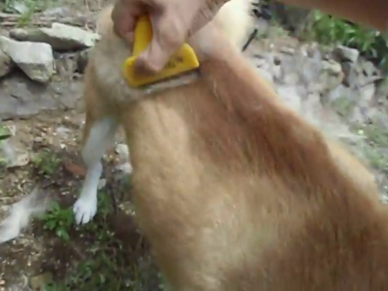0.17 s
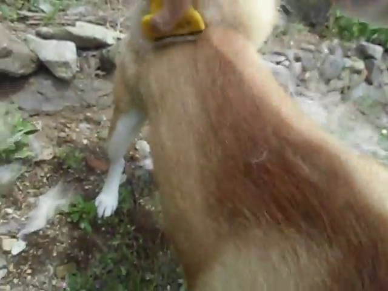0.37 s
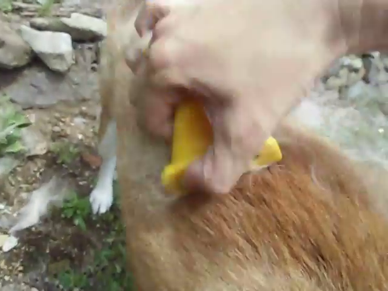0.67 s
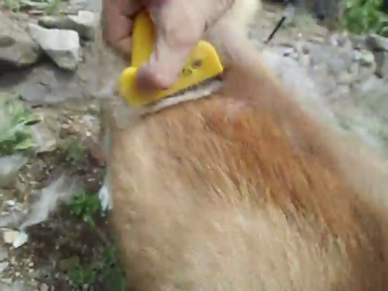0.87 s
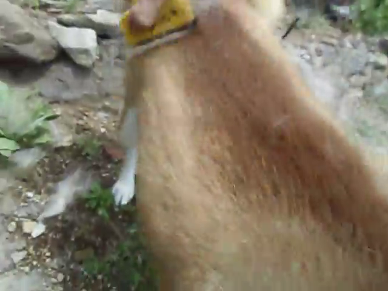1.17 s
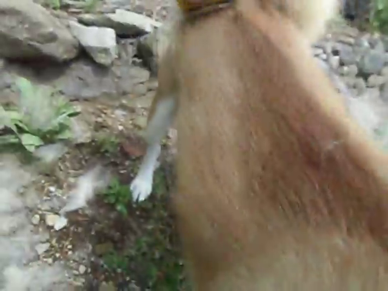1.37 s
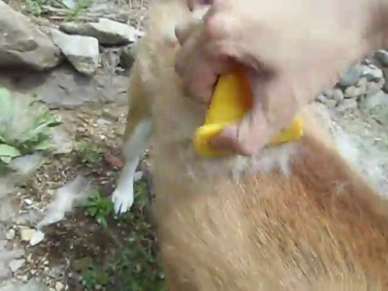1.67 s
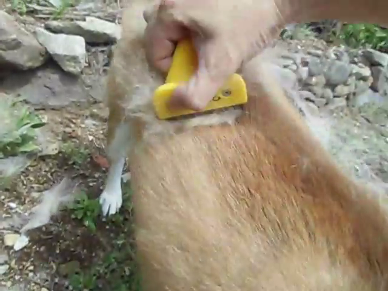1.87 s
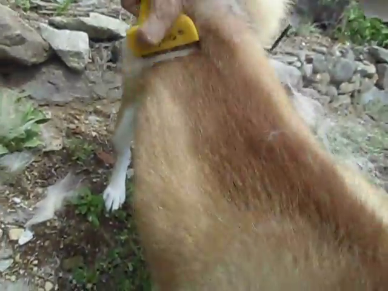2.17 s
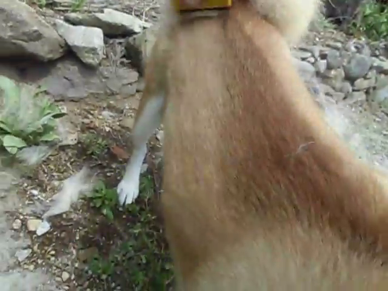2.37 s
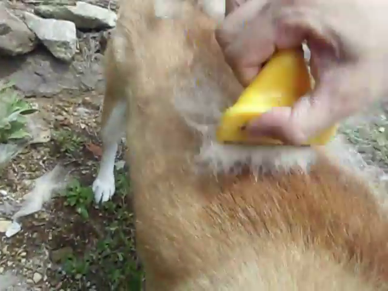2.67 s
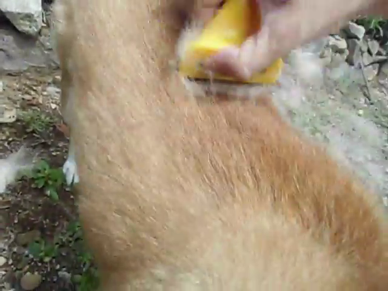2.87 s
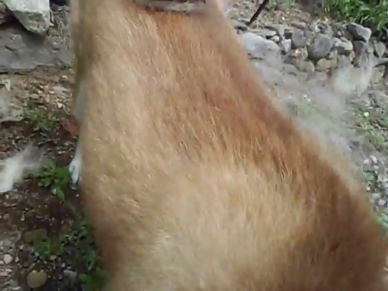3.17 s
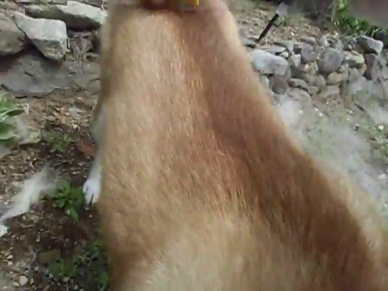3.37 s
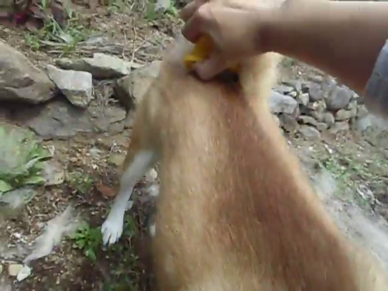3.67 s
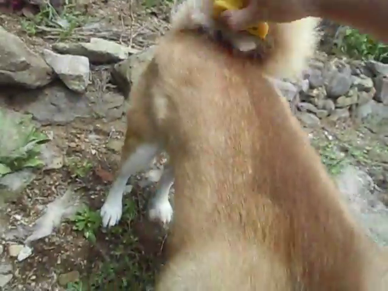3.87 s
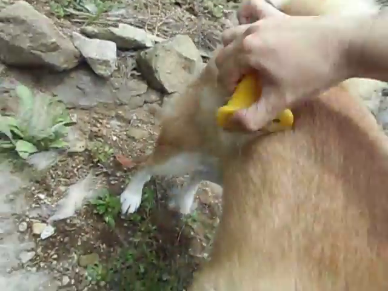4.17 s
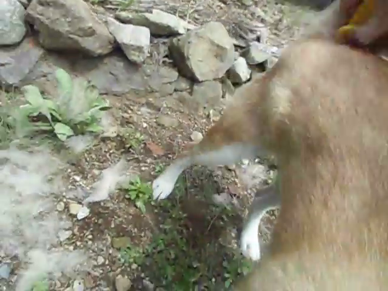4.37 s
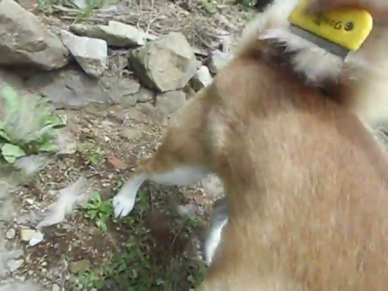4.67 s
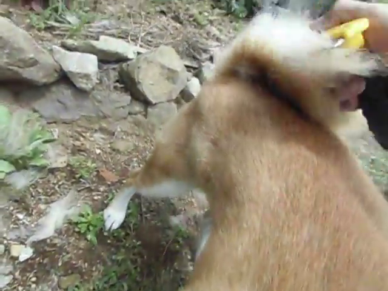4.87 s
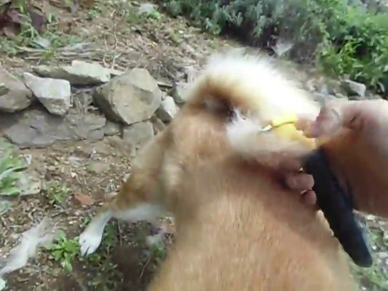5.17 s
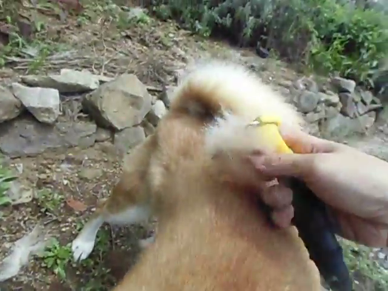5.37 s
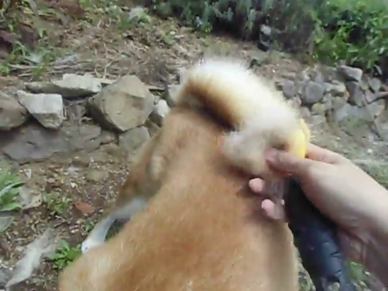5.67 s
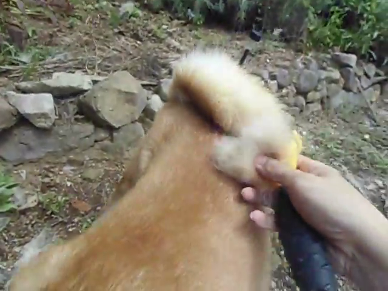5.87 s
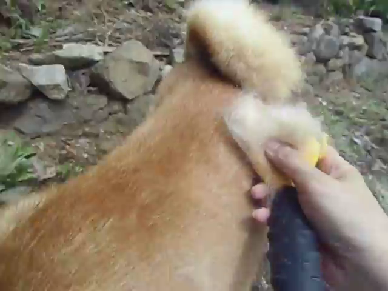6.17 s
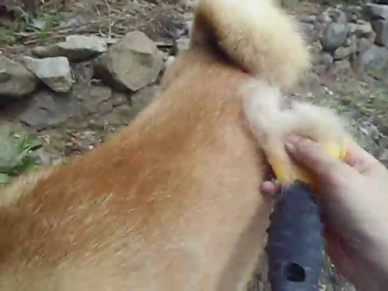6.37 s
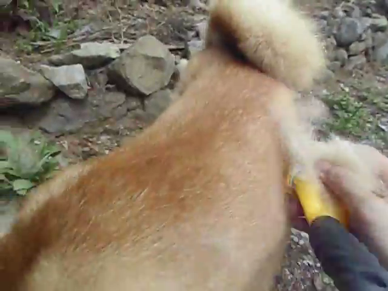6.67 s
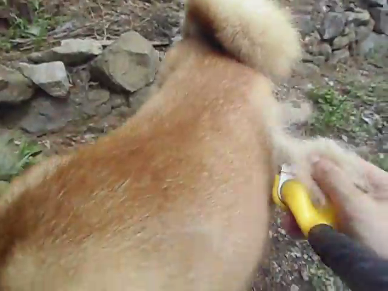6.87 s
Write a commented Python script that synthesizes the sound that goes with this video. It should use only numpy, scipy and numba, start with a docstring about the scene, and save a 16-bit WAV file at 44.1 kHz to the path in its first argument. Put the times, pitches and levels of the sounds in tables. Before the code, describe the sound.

A high, fast-pulsing cicada sings throughout, with more cicadas droning farther off in a garden. Close to the hand-held microphone, a few faint comb strokes scratch through a dog's fur during the first half, alongside the soft whirr of a focusing lens. Gusts and handling add low rumble and thumps that cluster after the midpoint. One last thump lands near the end, followed by a couple of faint squeaks.

```python
"""A dog is brushed in a summer garden, close to a hand-held camera with one microphone.
From the start a near cicada buckles its ribbed drums, throbbing fifteen times a second over a steady
chorus and soft air. At once the lens motor ticks in short runs and the comb rasps faintly through the coat.
From about two seconds air and handling buffet the microphone with low thumps, hardest between four and
five and a half. Faint squeaks slip in near three seconds and again after the last thump."""
import sys
import numpy as np
from scipy import signal
from scipy.fft import rfft, irfft
from scipy.io import wavfile
from scipy.ndimage import uniform_filter1d, map_coordinates
from numba import njit

SR = 44100
rng = np.random.default_rng(int(sys.argv[2]) if len(sys.argv) > 2 else 0)


def dump(signal):
    """Clip the signal to [-1, 1] and save it as 16-bit WAV at the path in sys.argv[1]."""
    limited = np.clip(np.atleast_2d(signal).T, -1, 1)
    pcm = np.round(limited * 32767).astype(np.int16)
    wavfile.write(sys.argv[1], SR, pcm)


N = 309582
T = np.arange(N) / SR

# Tone of the garden air. Each row: frequency in Hz, gain in dB.
AIR_COLOUR = [(15, -24), (25, -0.5), (75, -12.5), (204, -14.5), (251, -18), (336, -20), (543, -23.5),
              (590, -24), (696, -26), (2050, -36), (3600, -39.5), (4680, -53), (7920, -120)]
# Hiss of the most distant insects. Each row: frequency in Hz, gain in dB.
HAZE_COLOUR = [(3300, -14.5), (4100, -6.5), (4600, -18), (5800, 3.5), (6800, -3), (7700, -3), (8700, -11),
               (9800, 1.5), (12000, 0), (15500, 2)]
# Ribs that buckle in one muscle stroke. Each row: place in the cycle from 0 to 1, gain in dB.
RIBS = [(0, -4.5), (0.261, -20), (0.491, -5), (0.771, -12)]
# The near cicada's fader, for drums and abdomen alike. Each row: time in seconds, level in dB.
SONG_LEVEL = [(0, -45), (.7, -42.5), (2.1, -43), (2.5, -45), (2.9, -45), (3.35, -45), (4.1, -42.5),
              (4.7, -44.5), (5.1, -41), (5.6, -41.5), (6.2, -45.5), (7, -44.5)]
# Its throb drifts around the even beat. Each row: time in seconds, lead in cycles.
THROB_LEAD = [(0, .22), (.6, .03), (1.3, .05), (2.6, -.03), (4.1, .02), (5.3, -.01), (7, .23)]
# Pace of its drum muscles. Each row: time in seconds, stroke rate in Hz.
MUSCLE_RATE = [(0, 175.3), (2.5, 175.8), (7, 177.1)]
# Ring of its drums, slack then stretched. Each row: pitch in Hz, width in Hz, gain in dB.
DRUM_RING = [(10700, 640, -4.5), (15000, 2060, -2.5)]
# Its hollow abdomen. Each row: pitch in Hz, width in Hz, slack gain in dB, stretched gain in dB.
ABDOMEN_RINGS = [(4830, 200, -13, -25), (5156, 640, 6.5, -14.5), (7905, 830, -19, 2.5)]
# Far cicadas. Each row: muscle rate in Hz, ring pitch in Hz, width in Hz, level in dB.
FAR_CICADAS = [(175.2, 4190, 43, -69.5), (179.8, 5370, 510, -60.5), (171.7, 9680, 350, -62.5),
               (168.8, 11800, 1800, -61.5)]
# One more cicada swells and fades. Each row: time in seconds, level in dB.
NEIGHBOUR_LEVEL = [(0, -54), (.8, -53.5), (2.2, -55), (3, -59), (4.6, -62.5), (4.85, -58), (5.4, -51),
                   (5.9, -55.5), (7, -58.5)]
# Bounce off the dog's flank. Each row: time in seconds, lag in milliseconds, strength from 0 to 1.
FLANK_ECHO = [(0, 0.46, .03), (5.1, 0.72, 0.07), (5.4, 0.67, 0.07), (5.85, 0.69, 0.12), (6.15, 0.73, 0),
              (6.5, .54, 0.04), (7, .56, 0)]
# Tone of the wind rumble. Each row: frequency in Hz, gain in dB.
BUFFET_COLOUR = [(8.8, -36), (15, 1.5), (35, 4.5), (85, -6.5), (157, -15), (313, -27.5), (351, -33),
                 (453, -40), (700, -47.5), (910, -69), (1540, -120)]
# Gusts on the microphone. Each row: start in seconds, hold in seconds, level in dB.
GUSTS = [(0, 0.1, -39.5), (1.81, 0.17, -39.5), (2.04, 0.21, -39), (2.6, 0.16, -36), (2.842, 0.035, -36.5),
         (3.907, .05, -37.5), (4.04, .17, -34), (4.271, 0.23, -32), (4.566, 0.18, -36.5),
         (4.785, 0.27, -40), (5.154, 0.055, -32.5), (5.277, 0.176, -31.5), (5.47, 0.11, -38),
         (6.104, 0.045, -38), (6.313, 0.057, -37.5), (6.434, 0.055, -28)]
# Low thumps. Each row: time in seconds, level in dB, pitch in Hz.
THUMPS = [(1.829, -30, 56), (1.91, -29, 56), (2.729, -31, 175), (4.18, -25, 56), (4.278, -22, 70.5),
          (4.335, -29, 56), (4.418, -17, 45), (4.469, -23, 90), (4.589, -23.5, 56), (4.667, -21.5, 60),
          (4.8, -29, 130), (5.287, -21.5, 94.5), (5.313, -21, 60), (5.349, -18.5, 104), (5.388, -21, 114),
          (5.415, -24, 150), (6.432, -21, 56)]
# Runs of the lens motor. Each row: start in seconds, end in seconds, relative level in dB.
FOCUS_RUNS = [(.04, 0.624, -60.5), (.94, 1.35, -60), (1.563, 1.71, -56), (2.04, 2.14, -62.5),
              (2.265, 2.44, -61.5), (2.77, 2.922, -60.5), (3.04, 3.41, -59), (4.04, 4.41, -59.5),
              (4.81, 5.342, -58), (5.51, 6.41, -59.5), (6.68, 6.82, -61)]
# Ring of the lens barrel. Each row: pitch in Hz, width in Hz, gain in dB.
BARREL_RINGS = [(1376, 320, -3), (1846, 196, -2.5), (1980, 250, -1), (2620, 210, 1)]
# Comb strokes. Each row: middle in seconds, length in seconds, level in dB.
COMB_STROKES = [(.11, 0.091, -54), (.42, 0.41, -65), (1.07, 0.15, -56.5), (1.87, .04, -62),
                (2.127, .08, -60), (2.95, 0.087, -56), (3.31, 0.055, -61), (3.794, .03, -56),
                (4.334, 0.1, -58)]
# Teeth catching on a tangle. Each row: time in seconds, starting level in dB.
SNAGS = [(.115, -41), (.13, -43), (1.013, -40), (1.036, -37), (1.135, -43), (3.81, -43)]
# Tone of the comb's rasp. Each row: frequency in Hz, gain in dB.
COMB_COLOUR = [(300, -25), (1200, 13), (2800, 16.5), (4000, 20), (5500, -3), (9000, 17), (15000, -34)]
# Faint squeaks. Each row: middle and length in seconds, start and end pitch in Hz, level in dB.
SQUEAKS = [(2.96, 0.032, 4620, 4750, -54), (2.975, 0.023, 4120, 3900, -53), (6.489, 0.025, 3880, 3920, -54),
           (6.53, .02, 3600, 3300, -58)]

THROB_HZ, THROB_SCATTER_DB, STRETCH_SCATTER = 15, .33, .025  # no two throbs are quite alike
STRETCH_LEAD_RAD, STRETCH_POWER = .23, 1.38  # shape of the abdomen's travel
ABDOMEN_DB, ABDOMEN_EXTRA_SWELL = -9, .17  # level ahead of the song fader; extra dB for each dB of song
BREEZE_DB, BREEZE_SPREAD_DB = -50, 2.5
GUST_ATTACK_S, GUST_RELEASE_S = .028, .029
FRAME_HZ, SNAPS_PER_S, TOP_HZ = 29.978, 2500, 15850


def undb(db):
    """Decibels to gain."""
    return 10 ** (np.asarray(db) / 20)


def level(x, db):
    """Set the rms level."""
    return x * undb(db) / np.sqrt(np.mean(x ** 2))


def curve(rows):
    """Join (seconds, value) rows by straight lines."""
    return np.interp(T, *np.transpose(rows))


def walk(rate):
    """Smooth random wandering with a spread of 1."""
    bins = np.arange(N // 2 + 1) * SR / N
    return level(irfft(rfft(rng.standard_normal(N)) / (1 + (bins / rate) ** 4), N), 0)


def colour(x, points):
    """Equalise a sound through (Hz, dB) points, rolling off beyond them; rms 1."""
    hz, db = np.transpose(points)
    log_hz = np.log(np.arange(N // 2 + 1) * SR / N + 1)
    outside = np.abs(log_hz - np.clip(log_hz, np.log(hz[0]), np.log(hz[-1])))
    gain = undb(np.interp(log_hz, np.log(hz), db) - 20 * outside)
    return level(irfft(rfft(x) * gain, N), 0)


@njit
def bandpass(x, hz, width):
    """State-variable band-pass whose centre and width may move."""
    out, band, low = np.empty(len(x)), 0., 0.
    for i in range(len(x)):
        g = np.tan(np.pi * hz[i] / SR)
        damping = np.pi * width[i] / SR * (1 + g * g) / g
        v = (band + g * (x[i] - low)) / (1 + g * (g + damping))
        band, low = 2 * v - band, low + 2 * g * v
        out[i] = damping * v
    return out


def ring(x, hz, width):
    """A resonance with steep skirts."""
    hz = np.minimum(hz, SR * .45) * np.ones(N)
    width = width * np.sqrt(2) * np.ones(N)
    return bandpass(bandpass(x, hz, width), hz, width)


def clicks(at, size):
    """Sharp clicks at times that fall between samples."""
    taps = np.floor(at * SR).astype(int)[:, None] + np.arange(-7, 9)
    offset = taps - at[:, None] * SR
    out = np.zeros(N)
    np.add.at(out, taps % N, size[:, None] * np.sinc(offset) * np.cos(np.pi * offset / 16) ** 2)
    return out


def background():
    """A bed of soft outdoor air under the hiss of distant insects."""
    air = colour(rng.standard_normal(N), AIR_COLOUR) * undb(-46 + .73 * walk(4.2))
    haze = colour(rng.standard_normal(N), HAZE_COLOUR) * undb(-48.5 + .73 * walk(9.8))
    return air + haze


def tymbal(hz, jitter_ms, scatter_db):
    """The raw buzz of a cicada's drum: each muscle stroke buckles a row of ribs, one click a rib."""
    turns = np.cumsum(hz) / SR
    strokes = np.arange(int(turns[-1]))
    out = 0
    for share, db in RIBS:
        late, size = rng.standard_normal((N // 200, 2))[strokes].T
        times = np.interp(strokes + share, turns, T) + late * jitter_ms / 1000
        out = out + clicks(times, undb(db + scatter_db * size))
    return out


def near_cicada():
    """The pumping abdomen stretches the drums: their ring swoops while its resonances trade places."""
    throb = 2 * np.pi * (THROB_HZ * T + curve(THROB_LEAD))
    # the abdomen lingers at both ends of its travel
    travel = .5 + .5 * np.tanh(np.cos(throb + STRETCH_LEAD_RAD)) / np.tanh(1)
    stretch = np.abs(travel) ** STRETCH_POWER + STRETCH_SCATTER * walk(THROB_HZ)
    # the muscles run a little faster under tension
    rate = curve(MUSCLE_RATE) * (1 + .014 * np.cos(throb + .4))
    buzz = tymbal(rate * (1 + .0012 * walk(25)), jitter_ms=.012, scatter_db=1.5)
    hz, width, db = (slack + (taut - slack) * stretch for slack, taut in zip(*DRUM_RING))
    # the ribs snap hardest at full stretch and weakest in passing
    snap_db = db + .97 * stretch ** 6 - 10 * stretch * (1 - stretch)
    drums = ring(buzz, hz * (1 + .0033 * walk(40)), width) * undb(snap_db)
    drums += ring(buzz, hz=14400, width=5000) * undb(-19.5) * stretch  # a broad crack around the ring
    abdomen = sum(ring(buzz, hz, width) * undb(slack_db + (taut_db - slack_db) * stretch)
                  for hz, width, slack_db, taut_db in ABDOMEN_RINGS)
    song_db = curve(SONG_LEVEL)
    abdomen *= undb(ABDOMEN_EXTRA_SWELL * song_db)
    voice = level(drums, -.33) + level(abdomen, ABDOMEN_DB)
    return voice * undb(song_db + THROB_SCATTER_DB * walk(THROB_HZ))


def far_cicada(rate, hz, width):
    """A cicada drones through one fixed ring, its buzz wavering a little; rms 1."""
    buzz = tymbal(rate * (1 + .007 * walk(25)), jitter_ms=.025, scatter_db=2)
    return level(ring(buzz, hz, width), 0)


def chorus():
    """Cicadas hold a drone further off, while one with a narrow ring swells and fades."""
    drone = sum(far_cicada(rate, hz, width) * undb(db + walk(.61)) for rate, hz, width, db in FAR_CICADAS)
    neighbour = far_cicada(rate=175, hz=4650, width=190) * undb(curve(NEIGHBOUR_LEVEL))
    return drone + neighbour


def garden(x, wet_db, decay_s):
    """Stone walls and foliage scatter a short tail."""
    tail = rng.standard_normal(SR // 2) * np.exp(-T[:SR // 2] / decay_s)
    wet = signal.fftconvolve(x, tail / np.linalg.norm(tail))[:N]
    return (x + undb(wet_db) * wet) / np.hypot(1, undb(wet_db))


def flank(x):
    """The dog's flank mirrors the insects into the moving camera, sweeping shallow notches in the hiss."""
    times, lags_ms, strengths = np.transpose(FLANK_ECHO)
    lag_s = np.interp(T, times, lags_ms) / 1000
    echo = map_coordinates(x, [(T - lag_s) * SR], mode="mirror")
    return x + np.interp(T, times, strengths) * echo


def whine():
    """A very faint, wavering tone at the back of the mix."""
    hz = 2457 * (1 + .012 * walk(120))
    db = -71.5 + 2.5 * walk(2)
    return np.sin(2 * np.pi * np.cumsum(hz) / SR) * undb(db)


def gust(start, length):
    """A gust's envelope rises quickly, holds and dies away."""
    attack = np.clip((T - start) / GUST_ATTACK_S + 1, 0, 1)
    return attack * np.exp(-np.maximum(T - start - length, 0) / GUST_RELEASE_S)


def wind():
    """Eddies rumble on the microphone in a light breeze and its gusts."""
    eddies = colour(rng.standard_normal(N), BUFFET_COLOUR)
    eddies /= np.sqrt(uniform_filter1d(eddies ** 2, size=SR // 10))  # even out the noise's own swells
    breeze = undb(BREEZE_DB + BREEZE_SPREAD_DB * walk(4.4))
    gust_power = sum((undb(db) * gust(start, length)) ** 2 for start, length, db in GUSTS)
    return eddies * np.sqrt(breeze ** 2 + gust_power)


def lens_motor():
    """The focus steps once a frame; each step starts quickly and whirrs out in the lens barrel."""
    frame, phase = np.divmod(T * FRAME_HZ + .54, 1)
    size, late = rng.standard_normal((int(frame[-1]) + 1, 2))[frame.astype(int)].T
    age = phase - .05 * np.abs(late)  # in frames
    step = np.interp(age, [0, .08, .3, .46, .85], [0, 1, .9, .3, 0])
    uneven = undb(2.5 * np.clip(size, -2, .7))
    running = sum(undb(db) * ((T > start) & (T < end)) for start, end, db in FOCUS_RUNS)
    whirr = rng.standard_normal(N) * step * uneven * running
    barrel = sum(undb(db) * ring(whirr, hz, width) for hz, width, db in BARREL_RINGS)
    return level(barrel, db=-61)


def comb():
    """Hairs slip off the teeth as dense tiny snaps, swelling with each stroke; at times a tooth snags."""
    snaps = rng.standard_normal(N) * (rng.random(N) < SNAPS_PER_S / SR)
    pressure = sum(undb(db) * np.exp(-2 * ((T - s) / length) ** 2) for s, length, db in COMB_STROKES)
    snags = sum(undb(db) * (T > s) * np.exp(-np.abs(T - s) / .001) for s, db in SNAGS)
    return colour(snaps, COMB_COLOUR) * pressure + colour(rng.standard_normal(N), COMB_COLOUR) * snags


def thumps():
    """Air and handling bump the microphone, each thump one push and pull of pressure."""
    out = np.zeros(N)
    for (s, db, hz), sign in zip(THUMPS, rng.choice([-1, 1], len(THUMPS))):
        near = np.abs(T - s) < .1
        phase = 2 * np.pi * hz * (T[near] - s - .003)
        out[near] += sign * undb(db) * phase * np.exp(-phase ** 2 / 2)
    return out


def squeaks():
    """Short unsteady tones that slide in pitch."""
    out, waver = 0, 1 + .0273 * walk(500)
    for s, length, start_hz, end_hz, db in SQUEAKS:
        hz = np.interp(T, [s - length / 2, s + length / 2], [start_hz, end_hz]) * waver
        swell = undb(db) * np.exp(-2 * ((T - s) / length) ** 2)
        out = out + swell * np.sin(2 * np.pi * np.cumsum(hz) / SR)
    return out


def scene():
    """Everything reaches one microphone, the same in both channels."""
    near = garden(near_cicada(), wet_db=-9.5, decay_s=.012)
    far = garden(chorus(), wet_db=-3, decay_s=.037)
    ambience = flank(near + far + background()) + whine()
    mix = ambience + wind() + thumps() + comb() + squeaks() + lens_motor()
    return np.tile(mix, (2, 1))


def record(dry):
    """The camera cuts the top steeply."""
    return signal.sosfilt(signal.ellip(12, .2, 80, TOP_HZ, fs=SR, output="sos"), dry)


dry = scene()
out = record(dry)
dump(out)
```